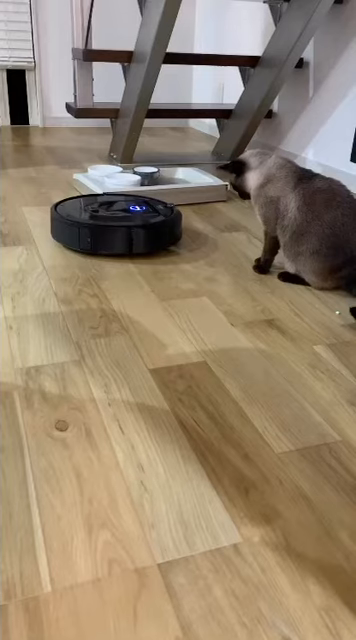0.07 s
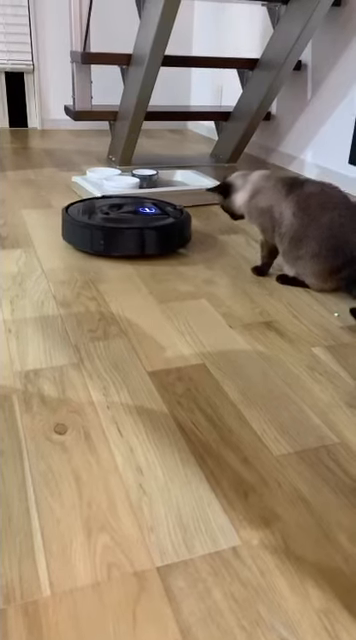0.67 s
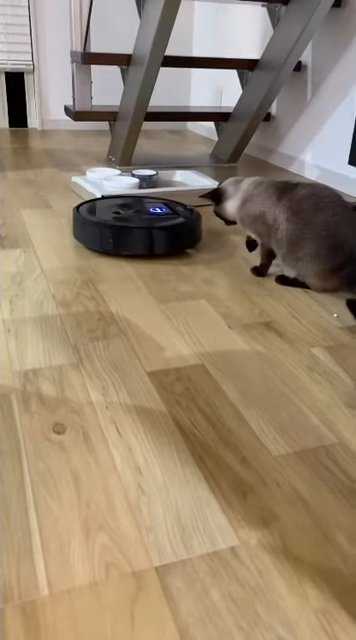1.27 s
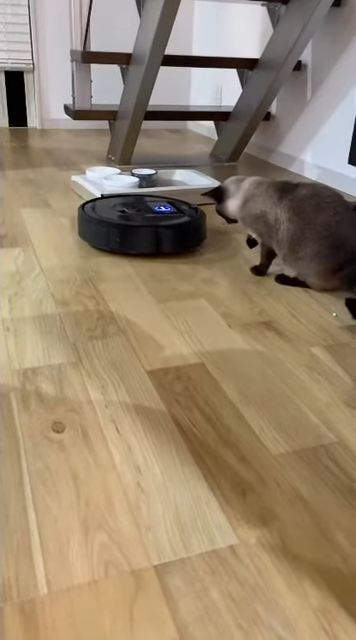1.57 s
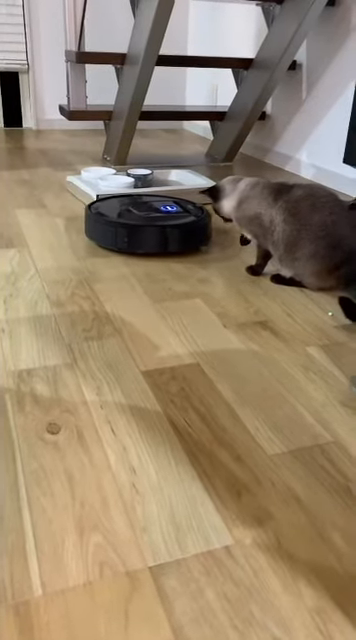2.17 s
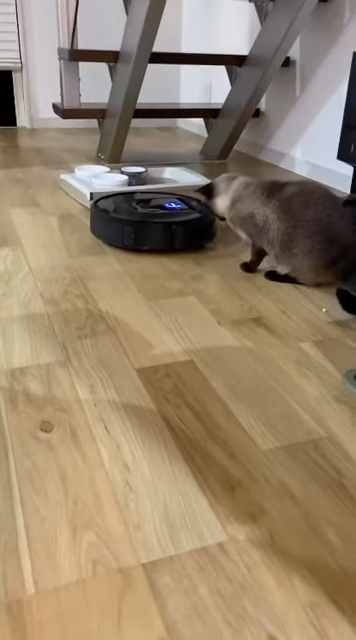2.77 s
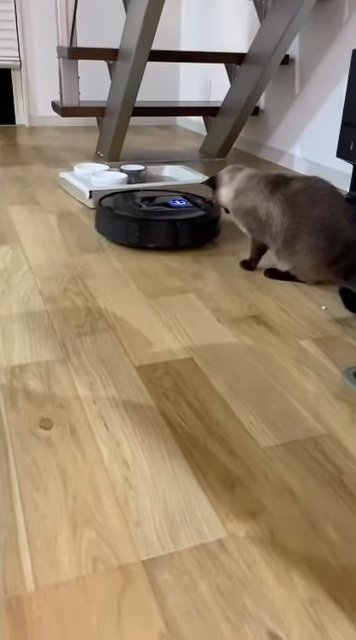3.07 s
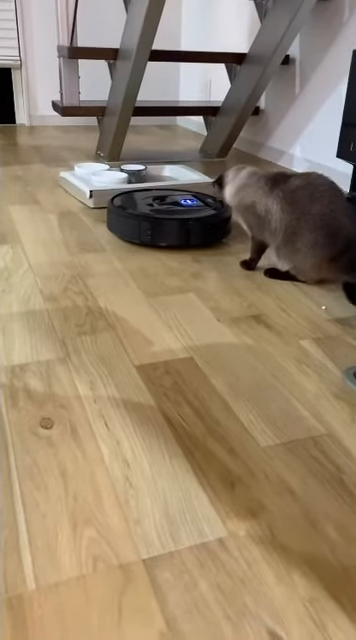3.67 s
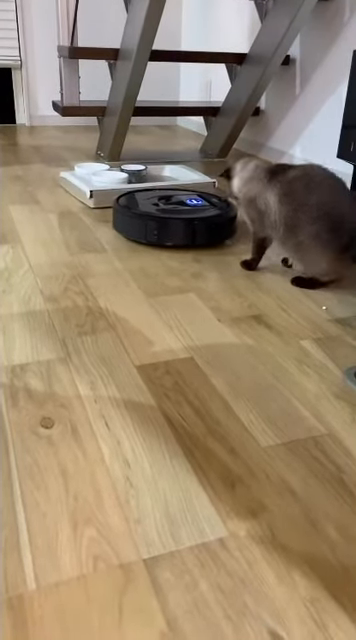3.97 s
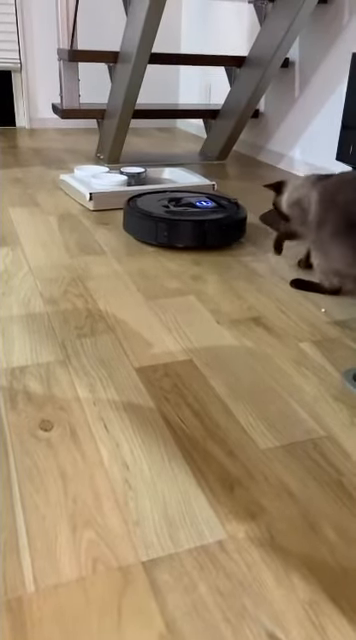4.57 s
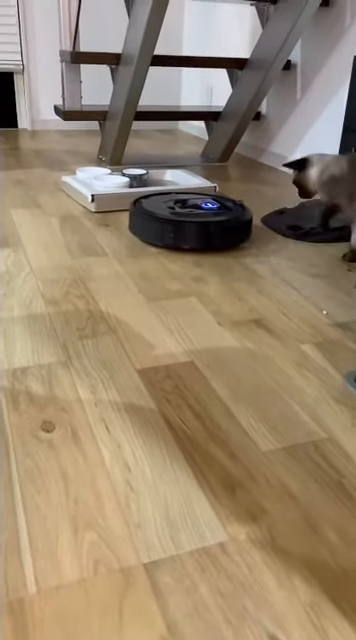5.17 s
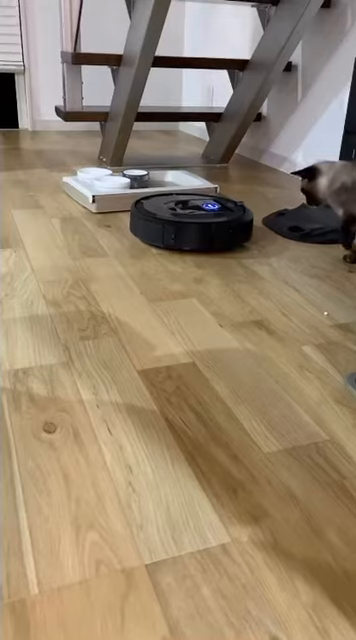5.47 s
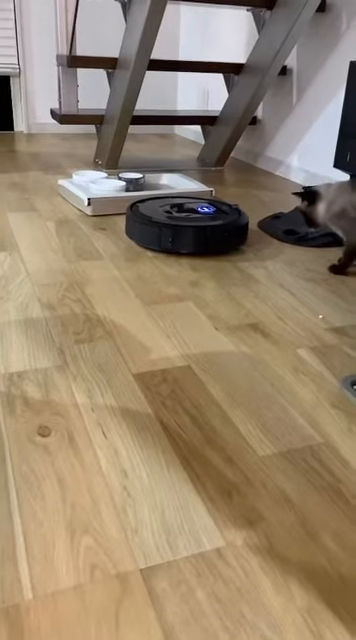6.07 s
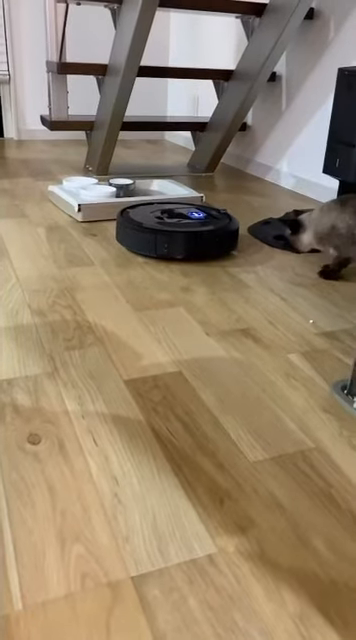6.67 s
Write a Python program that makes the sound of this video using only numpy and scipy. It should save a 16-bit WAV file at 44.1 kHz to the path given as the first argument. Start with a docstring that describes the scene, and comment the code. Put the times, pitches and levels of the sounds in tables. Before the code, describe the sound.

A small robot vacuum runs on a wooden floor for the whole seven seconds, heard in stereo from a few steps away in a room. Its motor whine throbs about five times a second over a steady fan hum, rushing air and fine bristle ticks. From about 0.6 to 2.7 seconds it turns, and the main whine and a thin hiss soften. From around 2 seconds the brush's rhythmic swishing chirp grows clearer. Slight squeaky tones swell near 1.5, 3.7 and 5.4 seconds. Very faint low bumps come near 1.5, 2 and 4 seconds. At about 4.7 seconds a cat swats the plastic shell: a quick cluster of claw scratch, knocks and bumper rattle, ending in a low thump on the boards by 4.9 seconds, with slight room echo. A soft paw scuff follows near 5.8 seconds while the vacuum whirs on to the end.

```python
"""Robot vacuum and cat

A robot vacuum turns and creeps over a wooden floor. Once per revolution the brush loads its motor, so
the whine sags and throbs, and friction makes the bristles swish and chirp. The suction fan hums over
a rush of air. A cat swats the plastic shell and jumps back: the impacts excite the modes of the
shell and the floorboards and rattle the bumper. One faint handling bump sounds near 4 s."""
import sys
import numpy as np
from scipy import signal
from scipy.fft import rfft, irfft, next_fast_len
from scipy.io import wavfile
from scipy.ndimage import uniform_filter1d

SR = 44100
rng = np.random.default_rng(int(sys.argv[2]) if len(sys.argv) > 2 else 0)


def put_to_file(sound):
    """Save the sound as 16-bit audio at rate SR, in the file named by the first command-line argument."""
    columns = np.atleast_2d(sound).T  # one column per channel
    safe = np.clip(columns, -1, 1)
    whole_steps = np.round(safe * 32767)
    wavfile.write(sys.argv[1], SR, whole_steps.astype(np.int16))


N = 300762
TIME = np.arange(N) / SR

MOTOR_HZ, BRUSH_HZ, FAN_HZ = 107.6, 4.899, 175.7  # rates of rotation
FASTEST_S = 0.208  # the motor peaks in speed here; lags count brush revolutions from this instant
GEAR_TEETH = 9
# the robot swings round, then creeps off: each move runs steadily from 0 to 1
TURNED = np.clip((TIME - 0.62) / 2.05, 0, 1)
CREPT = np.clip((TIME - 1.4) / 3.3, 0, 1)


def brush_motor(sag_hz=0.76, rebound_hz=0.14, jitter_hz=0.05, waver_db=0.6, roughness=0.4):
    """Frequency modulation: the brush's periodic load gives the whine a long sag and a quick rebound."""
    cycle = brush_cycle(0)
    deviation_hz = sag_hz * cycle + rebound_hz * (2 * cycle ** 2 - 1) + jitter_hz * drift(24.8)
    wobble = 2 * np.pi * np.cumsum(deviation_hz) / SR
    out = np.zeros((2, N))
    for harmonic, power in motor_spectrum().items():
        if harmonic == GEAR_TEETH:  # clean while it beams ahead, scattered once turned away
            scatter = between(0.3, 0.9, TURNED ** 2)
        else:  # low harmonics are steadier
            scatter = np.full(N, min(1, harmonic / 16))
        unsteady = from_db(waver_db * drift(4.6)) * (1 + scatter * roughness * drift(15.5))
        tone = np.exp(2j * np.pi * (harmonic * MOTOR_HZ * TIME + rng.random()))
        envelope = wall_interference(harmonic * wobble, strength=0.5 * scatter)
        out += np.sqrt(2 * power) * unsteady * np.real(tone * envelope)
    return out


# The motor's faint buzz. Each row: frequency in Hz, level per harmonic in dB.
BUZZ_SPECTRUM = [(750, -66), (1080, -62), (1200, -69.5), (1500, -66), (2500, -70.5), (3400, -68),
                 (4600, -67)]
# Casing resonances. Each row: frequency in Hz, width in Hz, level facing ahead in dB, gain from the
# turn in dB, gain from the creep in dB, throb in dB, its lag in revolutions, double-rate throb in dB.
CASING_RESONANCES = [(323, 40, -65, 9, -5, 1.5, 0.62, -1.5), (646, 90, -51.5, 2, 0, 3.5, 0.7, 0.5),
                     (861, 80, -48.5, 2, -6, 3, 0.05, 6), (1291, 60, -57.5, -5, -11, -1, 0.8, -2),
                     (1400, 60, -64.5, 4, -4, 5, 0.99, -4), (1614, 90, -53, -9.5, 9.5, 4, 0.94, 0.5),
                     (1766, 103, -56, 5, 3.5, 1, 0.88, 1), (1979, 72.6, -49, 0.5, 2, 2.5, 0.92, 2),
                     (2096, 127, -61, 8.5, 0, 0.5, 1, -1), (2260, 90, -60, 2.5, -0.5, 0, 0.71, 0),
                     (2450, 80, -59.5, 0, -4, 1.5, 0.072, 3.5), (2651, 89, -48, -4.5, 0, 1, 0.029, -1.5),
                     (2937, 61, -48, -0.5, -3.5, 3.5, 0.2, 0), (3080, 240, -51, 2, -13.5, 0.8, 0.047, 0),
                     (3658, 70, -52, -13, 7.5, 0.5, 0.83, 1.5), (3867, 220, -56, -1, 5.5, 1.5, 0.9, -1),
                     (4090, 120, -57, 8, 3, 3, 0.86, -2.5), (4582, 90, -62, 11, 2.5, 2, 0.64, 1.5)]
# Squeaks of one harmonic. Each row: peak time in seconds, half length in seconds, frequency in Hz,
# boost in dB.
SQUEAKS = [(1.308, 0.26, 2905, 3.5), (1.547, 0.49, 1937, 7), (3.653, 0.31, 1937, 4), (5.4, 0.47, 2905, 7.5),
           (6.56, 0.093, 968, 3)]

def motor_spectrum(mesh_overtone_db=2.5):
    """Forced resonance: the casing lifts the harmonics near its modes. Gives each one's power in time."""
    power = {harmonic: from_db(at_hz(BUZZ_SPECTRUM, harmonic * MOTOR_HZ)) ** 2
             for harmonic in range(7, 45)}
    power[GEAR_TEETH] = gear_mesh() ** 2
    for hz, width_hz, ahead_db, turn_db, creep_db, throb_db, lag, double_db in CASING_RESONANCES:
        peak = from_db(ahead_db + turn_db * TURNED + creep_db * CREPT) * throb(throb_db, lag, double_db)
        for harmonic in range(int((hz - width_hz) / MOTOR_HZ) + 1, int((hz + width_hz) / MOTOR_HZ) + 1):
            response = 1 / (1 + (2 * (harmonic * MOTOR_HZ - hz) / width_hz) ** 2)
            mesh_gain = from_db(mesh_overtone_db * (harmonic % GEAR_TEETH == 0))
            power[harmonic] = power.get(harmonic, 0) + (response * mesh_gain * peak) ** 2
    for peak_s, half_s, hz, boost_db in SQUEAKS:
        harmonic = round(hz / MOTOR_HZ)
        power[harmonic] = power.get(harmonic, 0) * from_db(boost_db * swell(peak_s, half_s)) ** 2
    return power


def gear_mesh(ahead_db=-38.5, turned_db=-48.5, creep_db=0.5):
    """Directivity: the mesh tone beams ahead and weakens as the robot turns. Gives its amplitude."""
    level_db = between(ahead_db, turned_db, TURNED) + creep_db * CREPT
    facing = (1 - TURNED) ** 2
    fading_throb = throb(depth_db=3.5 * facing, lag=0.64, double_db=facing)
    growing_throb = throb(depth_db=2.2 * CREPT, lag=0.99, double_db=-2 * CREPT)
    return from_db(level_db) * fading_throb * growing_throb


def throb(depth_db, lag, double_db, squareness=1.5):
    """Amplitude modulation at the brush rate and at twice that rate, as a gain of rms 1."""
    once = np.tanh(squareness * brush_cycle(lag)) / np.tanh(squareness)
    twice = 2 * brush_cycle(lag=0.31) ** 2 - 1
    return rms_one(from_db(depth_db * once + double_db * twice))


def wall_interference(wobble, strength, shift_rad_per_s=1.226, stereo_rad=0.82, paths=6, step=100):
    """Interference: a wobbling partial beats with reflections whose paths shift as the robot moves."""
    t, wobble, strength = TIME[::step], wobble[::step], strength[::step]
    field = np.exp(1j * wobble) * np.ones((2, 1))  # complex envelope, left and right
    for delay_s in rng.uniform(0.015, 0.049, paths):
        path_phase = rng.uniform(0, 2 * np.pi) + shift_rad_per_s * rng.normal() * t
        path_phase = path_phase + stereo_rad * rng.normal(size=(2, 1))
        late_wobble = np.interp(t - delay_s, t, wobble)
        field += strength / np.sqrt(paths) * np.exp(1j * (late_wobble + path_phase))
    # even out the power over one brush revolution
    field /= np.sqrt(uniform_filter1d(np.abs(field) ** 2, round(SR / step / BRUSH_HZ)))
    return np.array([np.interp(TIME, t, side) for side in field])


# Resonances of the dragging brush. Each row: frequency in Hz, width in Hz, level facing ahead in dB,
# level once turned in dB.
BRUSH_RESONANCES = [(1874, 360, -57.5, -49), (4077, 260, -61, -43.5)]

def brush_rub(lag=0.55, hold=0.52, attack=0.027, release=0.21, sag_db=4):
    """Friction: the dragging brush chirps once per revolution (times are in revolutions)."""
    phase = (BRUSH_HZ * (TIME - FASTEST_S) - lag) % 1
    contact = np.clip(phase / attack, 0, 1) * np.clip((hold + release - phase) / release, 0, 1)
    exposed = ramp(1.73, 0.81)  # late in the turn the brush comes round to face the listener
    chirp = sum(from_db(between(ahead_db, turned_db, exposed)) * resonant_noise(hz, width, diffuse=0.48)
                for hz, width, ahead_db, turned_db in BRUSH_RESONANCES)
    return contact * from_db(-sag_db * phase / hold - drift(3)) * chirp


def bristle_flicks(per_s=160, level_db=-42, spread_db=3.5):
    """A Poisson process: single bristles flick off the floor at a rate that follows the brush."""
    flicks = rng.random(N) < per_s * (1 + brush_cycle(0)) / SR
    sizes = from_db(level_db + spread_db * np.minimum(rng.exponential(1, N), np.pi))
    return butterworth(flicks * sizes * rng.choice([-1, 1], N), 3000, "high")


# Paw strikes. Each row: start in seconds, then the drive in dB to the claw scratch, shell and bumper.
PAW_STRIKES = [(4.699, -30.5, -67, -57), (4.704, -40.5, -65, -38), (4.721, -43, -36.5, -34),
               (4.729, -44, -33, -33), (4.742, -39, -31.5, -31), (4.750, -49, -33, -30),
               (4.774, -59, -42, -60), (4.796, -53, -59, -32), (4.804, -50, -41, -36),
               (4.809, -50, -41, -35)]

def cat_swat():
    """Impact excitation: the cat's paw scratches, rings the shell and shakes the bumper."""
    claws, shell, bumper = impulses(PAW_STRIKES)
    return claw_scratch(claws) + shell_knock(shell) + bumper_rattle(bumper)


# Claws on plastic and wood. Each row: frequency in Hz, relative spectral density in dB.
CLAW_SPECTRUM = [(200, -6), (700, -10), (1200, -5), (1800, 6), (2600, -5), (4000, 3.5), (7000, -0.5),
                 (10000, -0.5), (15000, -10)]

def claw_scratch(hits, scratch_t60=0.23, crack_t60=0.023, scuff_db=-43, grain_db=-0.5):
    """Friction noise: each strike cracks, then scratches; later a paw scuffs softly over the floor."""
    scuff = from_db(scuff_db) * swell(peak_s=5.79, half_s=0.074)
    contact = decay(hits, scratch_t60) + decay(hits, crack_t60) + scuff
    grain = from_db(grain_db * drift(200))
    return contact * grain * sum(band for hz, band in noise_bands(CLAW_SPECTRUM))


# Modes of the plastic shell. Each row: frequency in Hz, gain in dB, 60 dB decay time in seconds.
SHELL_MODES = [(238, -15.5, 0.11), (325, -11, 0.052), (352, -17, 0.17), (470, -12, 0.036),
               (583, 1.5, 0.028), (606, -24, 0.1), (723, -5.5, 0.068), (770, -9, 0.045), (945, -3, 0.027),
               (1404, -11, 0.04), (1950, -5, 0.04), (2690, -15, 0.054)]

def shell_knock(hits, skid_db=-23, skid_t60=0.15):
    """Modal vibration: a blow and a brief skid ring the shell, which is too small to radiate bass."""
    skid = from_db(skid_db) * decay(hits, skid_t60) * rng.standard_normal(N)
    return butterworth(ring(hits + skid, SHELL_MODES), 200, "high")


# Clacks of the bumper. Each row: start in seconds, drive in dB.
BUMPER_CLACKS = [(4.787, -34), (4.796, -37), (4.804, -32), (4.809, -38)]
# Resonances of a clack. Each row: frequency in Hz, width in Hz, gain in dB.
CLACK_RESONANCES = [(3700, 820, -10), (4920, 450, 1), (6100, 290, -5.5), (7300, 440, -6), (8500, 770, -8)]

def bumper_rattle(hits, rattle_t60=0.042, clack_t60=0.054):
    """Contact chatter: the struck bumper rattles and springs back, plastic snapping against plastic."""
    rattle = decay(hits, rattle_t60) * resonant_noise(hz=1680, width_hz=750)
    clacks, = impulses(BUMPER_CLACKS)
    plastic = sum(from_db(db) * resonant_noise(hz, width_hz) for hz, width_hz, db in CLACK_RESONANCES)
    return rattle + decay(clacks, clack_t60) * plastic


# Soft low thumps: paws on the boards, and one faint handling bump near 4 s.
# Each row: start in seconds, drive in dB.
LOW_THUMPS = [(1.456, -49.5), (2.036, -48), (3.83, -47), (3.99, -52), (4.731, -48), (4.789, -30),
              (4.801, -36.5), (4.848, -41), (6.191, -50)]
# Modes of the floorboards. Each row: frequency in Hz, gain in dB, 60 dB decay time in seconds.
BOARD_MODES = [(69.8, -13.5, 0.79), (87.3, -11, 0.45), (97, 4, 0.12), (124, -23, 0.066)]

def low_thumps(softness_hz=240):
    """Compliant impact: soft contact gives a dull push; paws and handling bump ring the same low modes."""
    bumps, = impulses(LOW_THUMPS)
    push = butterworth(bumps + 1e-18, [45, softness_hz], "band")
    return ring(-push, BOARD_MODES)


# The fan's weaker partials. Each row: harmonic number, level facing ahead in dB, level once turned in dB.
FAN_PARTIALS = [(1, -58, -56.5), (2, -57.5, -54), (4, -57.5, -60.5), (6, -52.5, -66)]

def suction_fan(wander_hz=0.152, waver_db=1.2, standing_db=-47.5, swell_db=2.5, flutter_db=0.62):
    """Rotor harmonics: the impeller hums in a few clean lines; the third sets up a standing wave."""
    angle = 2 * np.pi * np.cumsum(FAN_HZ + wander_hz * drift(2.56)) / SR
    hum = np.zeros(N)
    for harmonic, ahead_db, turned_db in FAN_PARTIALS:
        level_db = between(ahead_db, turned_db, TURNED) + waver_db * drift(0.66)
        hum += from_db(level_db) * np.sin(harmonic * angle + rng.uniform(0, 2 * np.pi))
    # creeping through the standing wave swells the note and pulls it to the left
    note_db = standing_db + swell_db * np.sin(np.pi * CREPT) + flutter_db * drift(16)
    pan_db, lead_rad = between(1, 6.5, CREPT), between(-0.25, 0.51, CREPT)
    sides = np.array([[0.5], [-0.5]])
    note = from_db(note_db + sides * pan_db) * np.sin(3 * angle + sides * lead_rad)
    return np.sqrt(2) * (hum + note)


# Airflow and rolling. Each row: frequency in Hz, relative spectral density in dB.
AIR_SPECTRUM = [(30, -23), (75, -12.5), (130, -9.5), (190, -5.5), (240, -0.5), (420, -8), (700, -2),
                (1300, -7.5), (2000, -9), (2500, -13.5), (3400, -8.5), (4300, -13.5), (5700, -7),
                (7400, -25.5), (9300, -14), (10800, -22.5), (14500, -21)]
# Swing of the hiss over one brush revolution. Each row: frequency in Hz, depth in dB.
SWISH_DEPTH = [(100, -1), (900, 1), (2500, 1.3), (5000, 0.5), (8000, 0.5), (13000, 5.5)]

def airflow(level_db=-42, flicker_db=2, bass_hz=500):
    """Modulated broadband noise: wheels rumble below air and bristle hiss that swells with each sweep."""
    rumble_db = between(1, 1.5, CREPT)
    sweep = brush_cycle(lag=0.85)
    out = np.zeros((2, N))
    for hz, band in noise_bands(AIR_SPECTRUM):
        bass_share = 1 / (1 + (hz / bass_hz) ** 2)
        gain_db = bass_share * rumble_db + at_hz(SWISH_DEPTH, hz) * sweep + flicker_db * drift(19)
        out += band * from_db(gain_db)
    return from_db(level_db) * out


def vent_hiss(ahead_db=-48, turned_db=-60):
    """Directivity: the hiss of a vent fades as the turn swings it off axis."""
    return from_db(between(ahead_db, turned_db, TURNED ** 2)) * resonant_noise(hz=4940, width_hz=380)


def wheel_drone(level_db=-52):
    """Forced vibration: the wheels keep a floorboard droning until the robot rolls off it."""
    return from_db(level_db) * (1 - ramp(3.5, 1.2)) * resonant_noise(hz=232, width_hz=50)


def room(x, t60=0.46, wall_hz=6000):
    """Reverberation: eight feedback delays a side, losing treble to the walls on every round."""
    out, pole = np.zeros((2, N)), np.exp(-2 * np.pi * wall_hz / SR)
    for k, lag in enumerate((rng.uniform(0.011, 0.045, 16) * SR).astype(int)):
        loop, state = x.copy(), [0.]
        gain = np.exp(-np.log(1000) * lag / SR / t60)
        for i in range(lag, N, lag):
            echo, state = signal.lfilter([gain * (1 - pole)], [1, -pole], loop[i - lag:i], zi=state)
            loop[i:i + lag] += echo[:N - i]
        out[k % 2] += (loop - x) * (-1) ** (k // 2)
    return out


# Likeness of left and right noise. Each row: frequency in Hz, coherence from 0 to 1.
STEREO_COHERENCE = [(100, 0.85), (300, 0.93), (700, 0.027), (1500, 0.024), (4000, 0.94), (14000, 1)]

def noise_bands(spectrum):
    """Partly coherent stereo noise: yields (centre in Hz, band), the bands summing to about rms 1."""
    edges = np.geomspace(30, 17000, 25)
    centres = np.sqrt(edges[1:] * edges[:-1])
    gains = from_db(at_hz(spectrum, centres))
    gains /= np.sqrt(np.sum(gains ** 2 * np.diff(edges)) * 2 / SR)
    white = rng.standard_normal((2, 2, N))
    for k, hz in enumerate(centres):
        mid, side = butterworth(white[k % 2], edges[k:k + 2], "band")
        coherence = at_hz(STEREO_COHERENCE, hz)
        band = np.sqrt((1 + coherence) / 2) * mid + np.sqrt((1 - coherence) / 2) * side * [[1], [-1]]
        yield hz, gains[k] * band


def resonant_noise(hz, width_hz, diffuse=0):
    """Narrowband noise of rms 1; the diffuse part differs between left and right."""
    white = rng.standard_normal((3, N))
    edges = [hz - width_hz / 2, hz + width_hz / 2]
    return rms_one(butterworth(white[0] + diffuse * white[1:], edges, "band"))


def ring(force, modes):
    """Modal superposition: each mode answers the force as a damped oscillator."""
    out = np.zeros(N)
    for hz, gain_db, t60 in modes:
        radius, angle = np.exp(-np.log(1000) / (t60 * SR)), 2 * np.pi * hz / SR
        feedback = [1, -2 * radius * np.cos(angle), radius ** 2]
        out += from_db(gain_db) * signal.lfilter([0, np.sin(angle)], feedback, force + 1e-18)
    return out


def impulses(events):
    """One impulse train for each level column of an event table."""
    start_s, *levels_db = np.transpose(events)
    trains = np.zeros((len(levels_db), N))
    trains[:, np.round(start_s * SR).astype(int)] = from_db(levels_db)
    return trains


def decay(hits, t60):
    """Exponential decay: each impulse starts an envelope that falls 60 dB in t60 seconds."""
    return signal.lfilter([1], [1, -np.exp(-np.log(1000) / (t60 * SR))], hits + 1e-18)


def drift(corner_hz, step=100):
    """Random fluctuation: low-passed noise of about rms 1."""
    pole = np.exp(-2 * np.pi * corner_hz * step / SR)
    slow = signal.lfilter([1], [1, -2 * pole, pole ** 2], rng.standard_normal(N // step + 1002))[1000:]
    return np.interp(np.arange(N) / step, np.arange(len(slow)), rms_one(slow))


def brush_cycle(lag):
    """A cosine with one period per brush revolution."""
    return np.cos(2 * np.pi * (BRUSH_HZ * (TIME - FASTEST_S) - lag))


def swell(peak_s, half_s):
    """A Gaussian envelope of height 1."""
    return np.exp(-((TIME - peak_s) / half_s) ** 2)


def ramp(start_s, lasts_s):
    """A steady rise from 0 to 1."""
    return np.clip((TIME - start_s) / lasts_s, 0, 1)


def between(first, last, share):
    """Linear interpolation."""
    return first + (last - first) * share


def at_hz(spectrum, hz):
    """Interpolation on a log-frequency axis."""
    frequencies, values = np.transpose(spectrum)
    return np.interp(np.log(hz), np.log(frequencies), values)


def butterworth(x, hz, kind):
    """A maximally flat filter with skirts of 12 dB per octave."""
    return signal.sosfilt(signal.butter(2, hz, kind, fs=SR, output="sos"), x)


def from_db(db):
    """Decibels to amplitude."""
    return 10 ** (np.asarray(db) / 20)


def rms_one(x):
    """Scale to rms 1."""
    return x / np.sqrt(np.mean(x ** 2) + 1e-20)


def scene(flick_room_db=-15, impact_room_db=-17):
    """Superposition of all sources; flicks and impacts reverberate in the room, their bass hardly."""
    flicks, impacts = bristle_flicks(), cat_swat() + low_thumps()
    into_room = from_db(flick_room_db) * flicks + from_db(impact_room_db) * impacts.mean(axis=0)
    echoes = room(butterworth(into_room, 170, "high"))
    robot = brush_motor() + brush_rub() + wheel_drone() + suction_fan() + vent_hiss() + airflow()
    return robot + flicks + impacts + echoes


# Phase between the channels. Each row: frequency in Hz, lead of the left in radians.
LEFT_LEAD = [(20, 0), (1100, -.4), (2240, 2.2), (3190, 1.3), (4200, 2.1), (5250, 3.3), (6600, 5.9),
             (15100, 15.7)]

def record(dry, cutoff_hz=15600):
    """Phase difference: left and right receive the treble out of step; a low-pass cuts the very top."""
    size = next_fast_len(N + SR // 10)
    lead_rad = np.interp(np.arange(size // 2 + 1) * SR / size, *np.transpose(LEFT_LEAD))
    rotation = np.exp(0.5j * lead_rad * np.array([[1], [-1]]))
    stereo = irfft(rfft(dry, size) * rotation, size)[:, :N]
    return signal.sosfilt(signal.ellip(10, 0.1, 80, cutoff_hz, fs=SR, output="sos"), stereo)


dry = scene()
out = record(dry)
put_to_file(out)
```